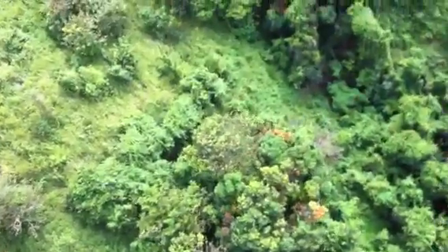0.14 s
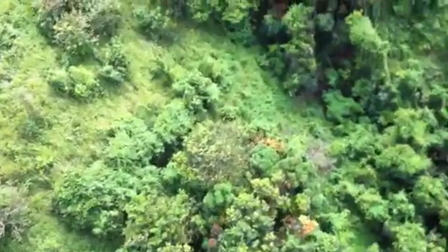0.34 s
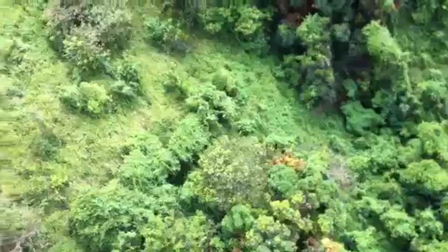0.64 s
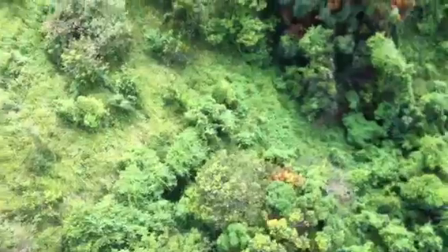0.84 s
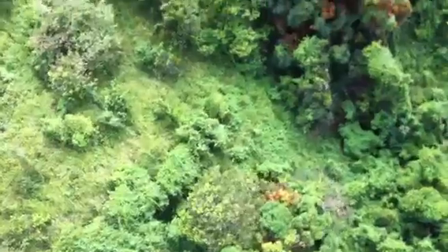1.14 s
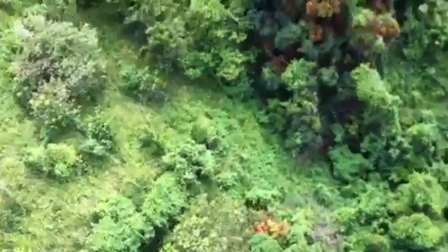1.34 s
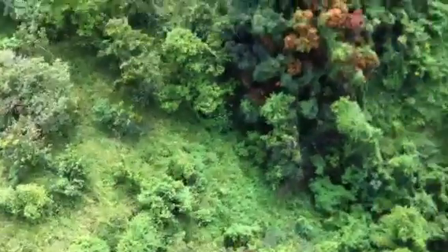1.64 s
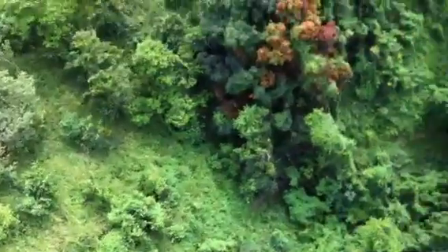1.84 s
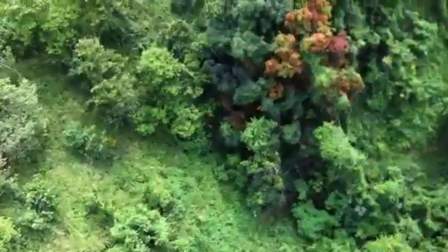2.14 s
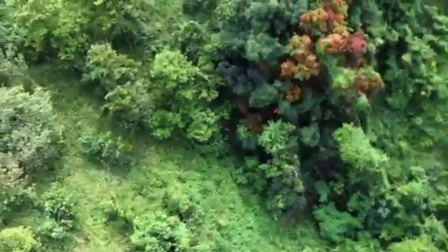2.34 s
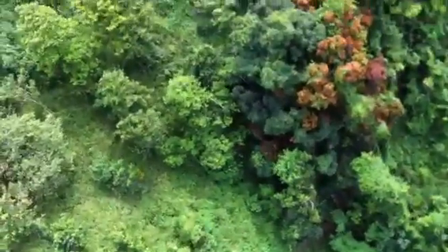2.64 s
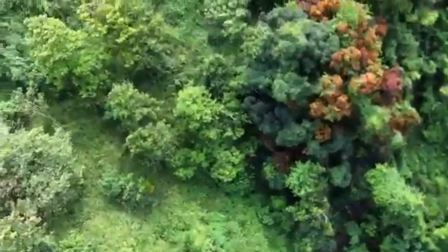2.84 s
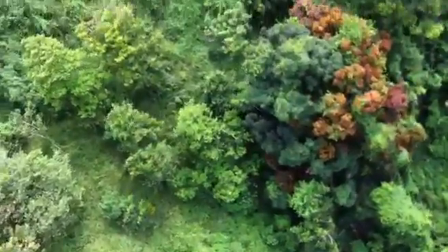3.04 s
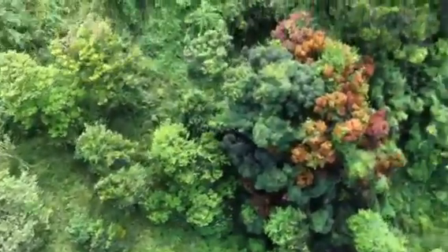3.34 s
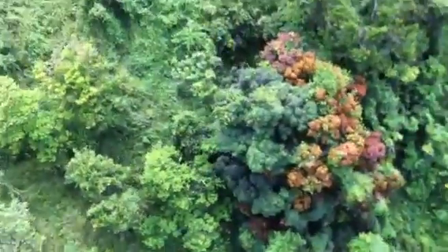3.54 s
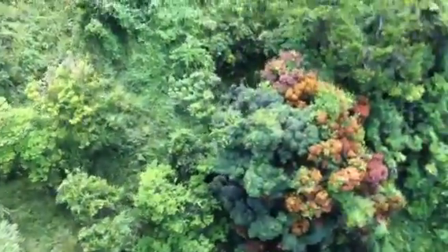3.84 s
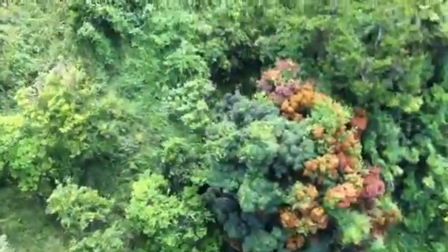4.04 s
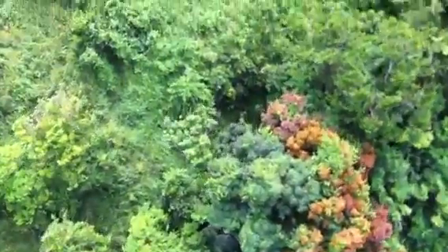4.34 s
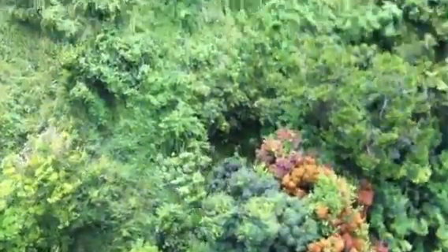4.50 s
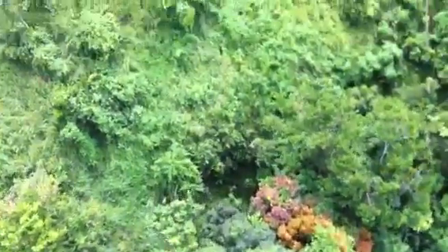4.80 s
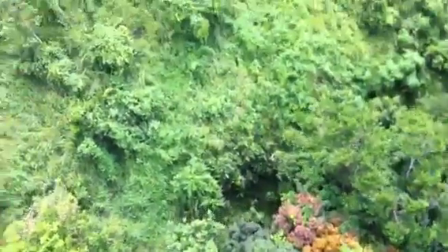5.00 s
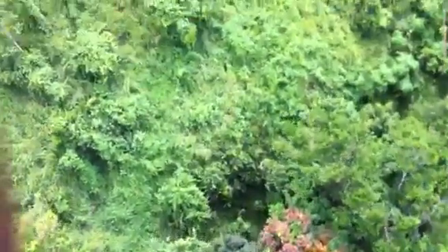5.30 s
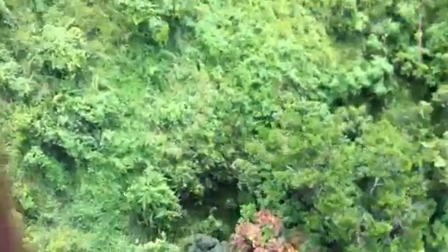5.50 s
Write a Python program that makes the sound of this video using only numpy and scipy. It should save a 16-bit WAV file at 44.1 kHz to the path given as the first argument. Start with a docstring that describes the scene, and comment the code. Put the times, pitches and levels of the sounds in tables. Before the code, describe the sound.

Riding high over green, wooded slopes, a pulley runs fast along a stranded cable. Its strong, slightly fluttering whine gradually drops in pitch over a low roar, rattle and bright steel hiss. Wind thumps on the rider's close microphone, then eases after about four seconds. Near the end the whine roughens, and a tick, a short falling squeak and scraping hiss are heard.

```python
"""A zip line trolley runs fast along a stranded steel cable and slowly loses speed.
The strands drum on the pulley as a falling whine, made of sine tones locked to the strand rate.
Shaped noise makes the rumble of the cable, the hiss of rolling steel and the wind on the rider's
microphone, which eases near the end. A tick and a brief falling squeak sound late in the ride.
A wind filter thins the deep bass and a limiter holds the peaks."""
import sys
import numpy as np
from scipy import signal
from scipy.fft import rfft, irfft, next_fast_len
from scipy.io import wavfile
from scipy.ndimage import uniform_filter1d, minimum_filter1d, map_coordinates

SR = 44100
rng = np.random.default_rng(int(sys.argv[2]) if len(sys.argv) > 2 else 0)


def transcribe(signal):
    """Save signal, clipped to [-1, 1], as a 16-bit WAV file at the path in sys.argv[1]."""
    frames = np.atleast_2d(signal).T
    limited = np.clip(frames, -1, 1)
    pcm = np.round(limited * 32767).astype(np.int16)
    wavfile.write(sys.argv[1], SR, pcm)


N = 249606


def amp(db):
    """Turn decibels into gain."""
    return 10 ** (np.asarray(db) / 20)


def unit(x):
    """Scale to rms 1."""
    return x / np.sqrt(np.mean(x ** 2) + 1e-20)


def seconds():
    """The time of every sample."""
    return np.arange(N) / SR


def noise():
    """Plain white noise."""
    return rng.standard_normal(N)


def curves(rows):
    """Join the rows with straight lines: one curve for each column after the time."""
    s, *columns = np.transpose(rows)
    return [np.interp(seconds(), s, column) for column in columns]


def wobble(rate):
    """A smooth random curve with rate random points a second."""
    points = rng.standard_normal(int(N * rate / SR) + 4)
    return map_coordinates(points, [np.arange(N) * rate / SR])


def swells(rows, fall_share=0.41):
    """Rounded swells: each row is top in s, length at half height in s, height; fall_share comes after the top."""
    t = seconds()
    fall = np.clip(fall_share, .05, .95)
    total = np.zeros(N)
    for s, length, height in rows:
        side = length * np.where(t > s, fall, 1 - fall)
        total += height * .5 ** (((t - s) / side) ** 2)
    return total


def filtered(x, response):
    """Filter x by a gain for each frequency."""
    m = next_fast_len(N + SR // 2)
    hz = np.fft.rfftfreq(m, 1 / SR)
    return irfft(rfft(x, m) * response(hz), m)[:N]


def coloured(x, spectrum):
    """Shape x by (Hz, dB) points joined on a log frequency axis, at rms 1."""
    f, db = np.transpose(spectrum)
    return unit(filtered(x, lambda hz: amp(np.interp(np.log(hz + 1), np.log(f), db))))


def ringing(x, modes):
    """Pass x through resonance peaks given as (Hz, width Hz, dB), at rms 1."""
    def peaks(hz):
        return sum(amp(db) / (1 + ((hz - centre) / width * 1.22) ** 2) for centre, width, db in modes)
    return unit(filtered(x, peaks))


def patchy_noise(patchy_db):
    """Noise whose colour drifts in patches of random gain, patchy_db strong."""
    z = signal.stft(noise(), nperseg=512)[2]
    field = uniform_filter1d(rng.standard_normal(z.shape), size=7, axis=0)  # smooth over frequency
    field = uniform_filter1d(field, size=36, axis=1)  # smooth over time
    return signal.istft(z * amp(patchy_db * unit(field)), nperseg=512)[1][:N]


def partials(rows, phase):
    """Wavering tones locked to the speed."""
    return sum(amp(db) * np.sin(multiple * phase + waver * wobble(25)) for multiple, db, waver in rows)


# How hard the wind buffets. Each row: time in seconds, level in dB before a 4 dB lift.
WIND_LEVEL = [(0, -25.5), (.3, -28), (.8, -31), (2.5, -30.5), (3.6, -30), (4.25, -34.5), (4.45, -43),
              (4.7, -37), (4.97, -54), (5.28, -38.5), (5.66, -47.5)]
# The colour of the buffeting. Each row: frequency in Hz, relative strength in dB per Hz.
BUFFET_COLOUR = [(20, -17), (40, -13), (62, -12), (90, -11), (125, -2), (165, 0.5), (215, 0.5), (300, -12),
                 (450, -31), (900, -42), (2500, -66)]
# The largest eddies. Each row: time in seconds, level in dB before a 0.5 dB lift.
EDDY_THUMPS = [(0.136, -14), (0.263, -11.5), (0.319, -10.5), (0.602, -18), (.725, -14), (0.961, -17),
               (1.012, -17), (1.278, -15.5), (1.452, -15), (1.681, -18.5), (1.734, -16), (1.998, -12.5),
               (2.302, -16), (2.456, -18), (2.53, -17), (2.873, -21), (3.012, -17.5), (3.112, -21),
               (3.277, -16.5), (3.853, -18.5), (4.043, -18.5)]
# The colour of those thumps. Each row: frequency in Hz, relative strength in dB per Hz.
THUMP_COLOUR = [(20, -30), (80, -13), (125, -9), (170, 2), (230, 3.5), (320, -11), (450, -6), (900, -39),
                (2500, -58)]
LUMP_DB, GUST_DB = 3, 2  # typical size of the quick lumps and the slower gusts


def wind():
    """Turbulent air pushes on the microphone in lumps; the largest eddies thump."""
    lumps = amp(LUMP_DB * wobble(50) + GUST_DB * wobble(15))
    air = amp(curves(WIND_LEVEL)[0] + 4.0) * coloured(lumps * noise(), BUFFET_COLOUR)
    turbulence = coloured(noise(), THUMP_COLOUR)
    for s, db in EDDY_THUMPS:
        swell = np.exp(-((seconds() - s) / 0.012) ** 2)
        thump = swell * turbulence
        # each eddy keeps its strength whatever the noise does at that moment
        air += amp(db + 0.5) * thump * np.linalg.norm(swell) / np.linalg.norm(thump)
    return air


# Flaws in the cable. Each row: time in seconds, level in dB before a 6 dB cut.
CABLE_FLAWS = [(4.7617, -15.5)]
# How the side plate rings. Each row: frequency in Hz, width in Hz, relative strength in dB.
PLATE_RING = [(1700, 430, 3), (2399, 500, -6), (3200, 450, -7)]


def ticks():
    """A flaw in the cable knocks the side plate, which rings very briefly."""
    out = np.zeros(N)
    for s, db in CABLE_FLAWS:
        t = np.maximum(seconds() - s, 0)
        decay = amp(-60 * t / 0.011) * (t > 0)  # falls 60 dB in 11 ms
        out += amp(db - 6) * decay * ringing(noise(), PLATE_RING)
    return out


# The falling squeak of the pulley. Each row: time in seconds, pitch in Hz, level in dB.
SQUEAK_PATH = [(4.72, 1043, -52), (4.745, 1022, -30), (4.795, 1024, -27), (4.815, 951, -35),
               (4.835, 850.5, -27), (4.86, 820, -59)]


def squeak():
    """The pulley squeaks briefly: one slightly unsteady sine tone that slides down."""
    hz, db = curves(SQUEAK_PATH)
    t = seconds()
    sounding = (t > SQUEAK_PATH[0][0]) & (t < SQUEAK_PATH[-1][0])
    tone = np.sin(2 * np.pi * np.cumsum(hz) / SR + 0.28 * wobble(80))
    return sounding * amp(db) * unit(tone)


# Each row: time in seconds, level of the cable rumble in dB, level of the pulley rattle in dB.
ROLL_LEVELS = [(0, -19.5, -27.5), (.6, -21, -27.5), (1.1, -19.5, -26.5), (2.25, -19, -26.5),
               (3.7, -20.5, -27), (4.8, -20, -26), (5.66, -23.5, -28.5)]
# The colour of the cable's roar. Each row: frequency in Hz, relative strength in dB per Hz.
CABLE_COLOUR = [(100, -55), (190, -48), (245, -5.5), (290, -0.5), (400, -1.5), (520, 0.5), (640, 5.5),
                (760, -0.5), (900, -14), (1300, -37), (2500, -54)]
# The colour of the pulley's rattle. Each row: frequency in Hz, relative strength in dB per Hz.
RATTLE_COLOUR = [(500, -20.5), (800, 0.5), (950, -1.5), (1120, -3), (1250, -11.5), (1380, -18),
                 (1600, -18.5), (1900, -24.5), (3000, -23.5), (6000, -47)]


def rumble():
    """The rough cable shakes the trolley: a low roar and a rattle of the pulley above it."""
    cable_db, rattle_db = curves(ROLL_LEVELS)
    cable = amp(cable_db + 1.22 * wobble(30)) * coloured(noise(), CABLE_COLOUR)
    rattle = amp(rattle_db + 1.1 * wobble(45)) * coloured(noise(), RATTLE_COLOUR)
    return cable + rattle


# The level that all the rolling parts share. Each row: time in seconds, level in dB.
HISS_LEVEL = [(0, -39), (0.35, -40.5), (0.55, -39), (0.8, -39.5), (1.15, -38.5), (1.45, -40), (1.97, -36),
              (2.3, -38.5), (2.6, -40), (3.3, -40), (3.55, -39), (3.8, -40.5), (4.15, -37.5), (4.5, -38),
              (4.7, -38), (5.66, -38)]
# The colour of the broad hiss. Each row: frequency in Hz, relative strength in dB per Hz.
STEEL_COLOUR = [(800, -14), (1650, -5), (2000, 0.5), (2450, -8), (3200, 1), (4700, 2.5), (6300, 4.5),
                (7600, -0.5), (8900, 2), (10000, 0.5), (11500, 0.5), (13000, -3), (14400, -10),
                (15700, -13.5)]
# How flange, tread and groove ring. Each row: frequency in Hz, width in Hz, relative strength in dB.
FLANGE_RING = [(3370, 480, -14), (5400, 770, -2.5), (5740, 410, -2.5)]
TREAD_TONES = [(3210, 180, -7), (6920, 340, -5), (7820, 930, -12)]
GROOVE_RING = [(3750, 230, -7), (4100, 530, -1)]
# How loud those three are. Each row: time in seconds, dB over the shared level.
FLANGE_LEVEL = [(0, 4.5), (.6, 0.5), (1.2, 1.5), (1.9, -1), (2.9, 5), (4.2, 2), (5.66, -0.5)]
TREAD_LEVEL = [(0, -2), (1.6, -2), (2.2, 3), (3.2, 3.5), (3.5, 1), (4.2, -2), (4.9, -17), (5.66, -9)]
GROOVE_LEVEL = [(0, -1.5), (1.2, 0.5), (1.7, -6), (2.5, -8), (2.9, -2), (4.5, -8), (5.66, -16)]
# The cable leans hard on the flange. Each row: loudest moment in seconds, length in seconds, level in dB.
FLANGE_SCRAPES = [(4.754, 0.29, -39), (5.124, 0.25, -28.5), (5.56, 0.37, -32)]
# What rings in a scrape. Each row: frequency in Hz, width in Hz, relative strength in dB.
SCRAPE_RING = [(1898, 480, -12.5), (3560, 380, -3), (5393, 550, 1.5)]
ROLLING_DB = 4.5  # the broad hiss over the shared level


def hiss(phase):
    """Steel rolls on steel, pulsing with the strands; flange, tread and groove ring as the cable shifts."""
    rolling = amp(ROLLING_DB) * coloured(patchy_noise(patchy_db=1.9), STEEL_COLOUR)
    flange = amp(curves(FLANGE_LEVEL)[0]) * ringing(patchy_noise(patchy_db=1.8), FLANGE_RING)
    tread = amp(curves(TREAD_LEVEL)[0]) * ringing(patchy_noise(patchy_db=1.9), TREAD_TONES)
    groove = amp(curves(GROOVE_LEVEL)[0]) * ringing(patchy_noise(patchy_db=1.0), GROOVE_RING)
    steady = amp(curves(HISS_LEVEL)[0]) * (rolling + flange + tread + groove)
    scrape_gain = swells([(s, length, amp(db)) for s, length, db in FLANGE_SCRAPES])
    scrape = scrape_gain * ringing(noise(), SCRAPE_RING)
    uneven_db = 0.5 * wobble(9) + 0.47 * wobble(40) + 0.22 * wobble(300)
    strand_pulse_db = 0.52 * np.sin(phase)
    return amp(uneven_db + strand_pulse_db) * (steady + scrape)


# Each row: time in seconds, level of the whine in dB.
WHINE_LEVEL = [(0, -12.5), (1.5, -14), (2.3, -12.5), (3.3, -10), (3.8, -11.5), (4.8, -10.5), (5.66, -10)]
# The pulley creeps up on the cable (whine dips) or bites into it (whine swells), then snaps back.
# Each row: time of the extreme in seconds, length in seconds, change of the whine in dB.
PULLEY_SHIFTS = [(.37, 0.024, -3), (.635, 0.063, -5.5), (.85, 0.081, -5), (1.1, 0.032, 2),
                 (1.23, 0.036, -3.5), (1.5, 0.048, -2), (1.81, .14, -4), (1.96, .07, 2),
                 (2.035, 0.068, -4.5), (2.265, .035, -3), (2.8, .1, -2.5), (3.555, 0.073, -5),
                 (3.732, .11, -8), (3.905, 0.039, -4.5), (3.99, .04, -7), (4.21, 0.043, -11),
                 (4.31, 0.078, 1), (4.48, .09, -1.5), (4.61, .04, 2), (4.67, 0.026, -2), (4.76, .05, -5.5),
                 (4.87, .08, 1.5), (4.98, 0.047, -9), (5.029, 0.025, -15), (5.048, .016, 4.5),
                 (5.075, .025, -7.5), (5.125, 0.074, -6), (5.355, 0.077, -8.5), (5.43, .04, 1),
                 (5.615, .05, -1.5)]
# Weak tones beside the whine. Each row: multiple of the strand rate, dB against the whine, waver in radians.
WEAK_PARTIALS = [(.5, -25, 0.19), (.605, -22, 0.77), (.88, -16.5, 1.67), (1.395, -29.5, 0.68),
                 (1.5, -28.5, 1.1), (3, -46, 0.42)]
# Each row: time in seconds, level of the whine's octave in dB.
OCTAVE_LEVEL = [(0, -54), (.65, -46.5), (1.3, -55), (1.6, -43), (1.9, -51), (2.35, -42), (2.6, -52),
                (3.4, -50), (5.66, -62)]
# Each row: time in seconds, level of the wheel hum in dB.
HUM_LEVEL = [(0, -38), (1.75, -34), (2.05, -24.5), (2.5, -36), (3.0, -35), (3.55, -28), (4.4, -30.5),
             (4.65, -34)]
# Tones that join in with the chatter. Each row: multiple of the strand rate, peak level in dB, waver in radians.
CHATTER_PARTIALS = [(.395, -35.5, 0.35), (.5, -33.5, 0.52), (.79, -30, .6), (1.5, -38.5, .6),
                    (2.48, -46, 2.7)]
CHATTER_S = 4.44  # when the chatter sets in (s)
FLUTTER, CHATTER_FLUTTER = 0.035, 0.039  # unevenness of the whine, and what chatter adds (radians)
SHIMMY_DB, SHIMMY_RAD = 0.7, .11  # the pulley shimmies, so the whine wavers in level and phase
SNAP_BACK = 0.21  # share of a shift's length that the return takes


def whine(phase):
    """Each strand nudges the pulley; uneven contact makes the tone flutter, more so once the pulley chatters."""
    chattering = np.clip((seconds() - CHATTER_S) / 0.31, 0, 1)
    level_db = curves(WHINE_LEVEL)[0] + swells(PULLEY_SHIFTS, SNAP_BACK) + SHIMMY_DB * wobble(30)
    flutter = FLUTTER + CHATTER_FLUTTER * chattering
    tone = np.sin(phase + SHIMMY_RAD * wobble(25) + flutter * wobble(90))
    tone *= np.exp(flutter * wobble(60))  # the level flutters too
    main = amp(level_db) * unit(tone + partials(WEAK_PARTIALS, phase))
    octave_db = curves(OCTAVE_LEVEL)[0] + 4.3 * wobble(7.8)
    octave = amp(octave_db) * unit(np.sin(2 * phase + 1.0 * wobble(25)))
    hum_db = curves(HUM_LEVEL)[0] + 1.4 * wobble(5.8)
    hum = amp(hum_db) * unit(np.sin(0.423 * phase + 0.39 * wobble(18)))  # 0.423 of the strand rate
    return main + octave + hum + chattering * partials(CHATTER_PARTIALS, phase)


# The slowing trolley. Each row: time in seconds, strands passing the pulley per second (Hz).
STRAND_RATE = [(0, 816), (0.85, 786.6), (1.1, 785), (1.45, 773), (2.0, 754.5), (2.2, 754), (2.4, 749.4),
               (2.8, 729.7), (3.17, 720.7), (3.5, 714.7), (3.68, 704.4), (4.3, 694), (4.43, 673),
               (4.53, 691), (4.7, 689.3), (4.98, 678.5), (5.5, 663.8), (5.66, 660.6)]
SWAY_HZ = 1.54  # the speed wavers slightly


def scene():
    """The strand rate times both the whine and the pulsing of the hiss."""
    strand_hz = curves(STRAND_RATE)[0] + SWAY_HZ * wobble(12)
    phase = 2 * np.pi * np.cumsum(strand_hz) / SR
    background = wind() + ticks() + squeak() + rumble()
    return (background + hiss(phase) + whine(phase))[None]


TOP_HZ = 15900  # nothing passes above this


def record(dry):
    """A wind filter cuts the deep bass, a fast limiter ducks the peaks, then the band limit."""
    def wind_filter(hz):
        cubed = (hz / 100) ** 3  # the cut starts near 100 Hz
        return cubed / np.hypot(1, cubed)
    x = filtered(dry[0], wind_filter)
    needed = np.minimum(1, amp(-3.5) / (np.abs(x) + 1e-9))  # gain that keeps peaks under -3.5 dB
    gain = uniform_filter1d(minimum_filter1d(needed, size=260), size=200)  # widths in samples
    return filtered(x * gain, lambda hz: hz < TOP_HZ)[None]


dry = scene()
out = record(dry)
transcribe(out)
```